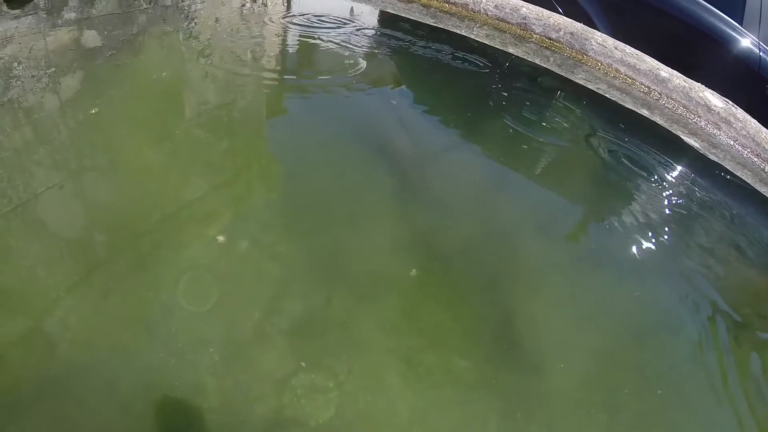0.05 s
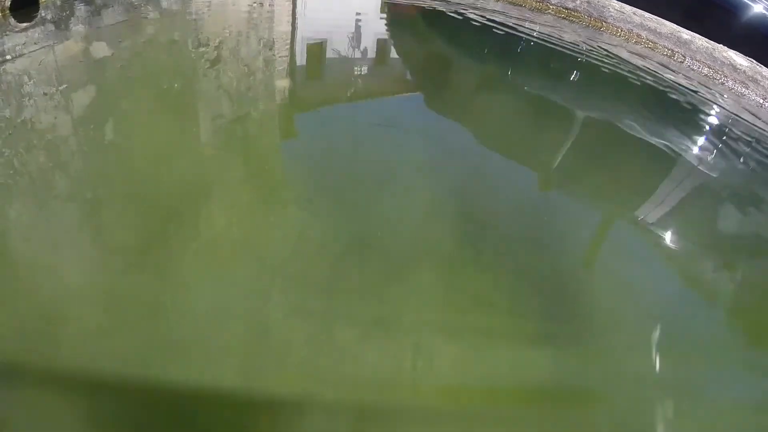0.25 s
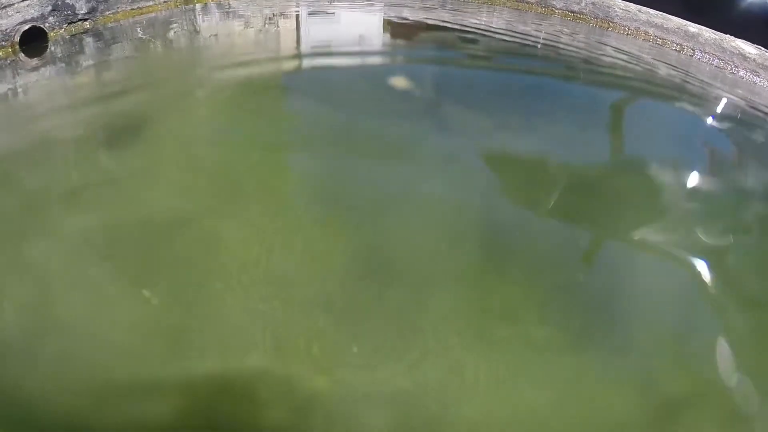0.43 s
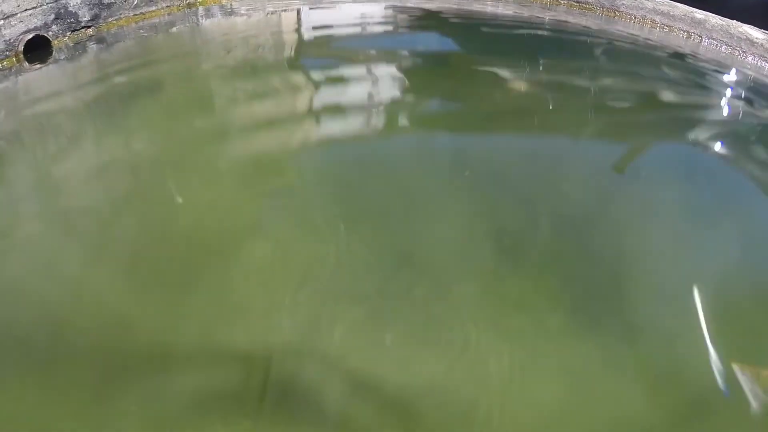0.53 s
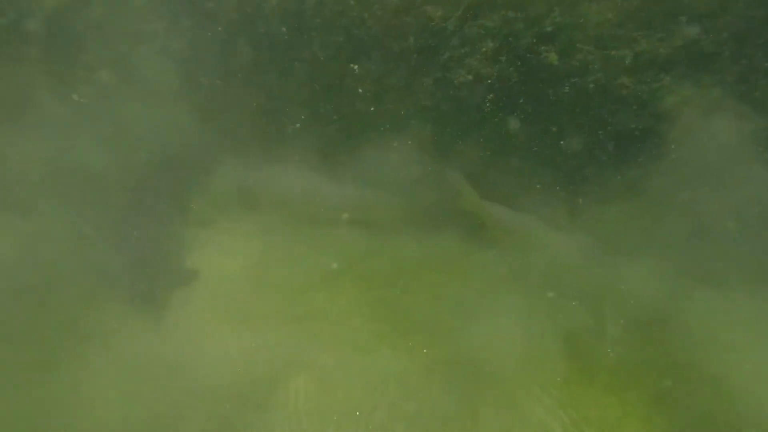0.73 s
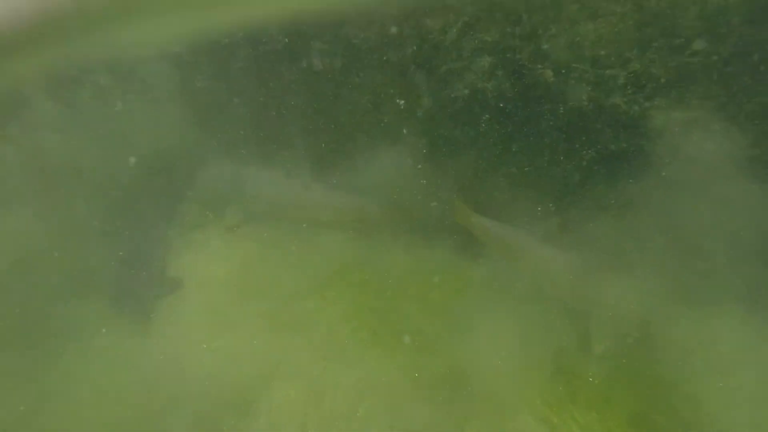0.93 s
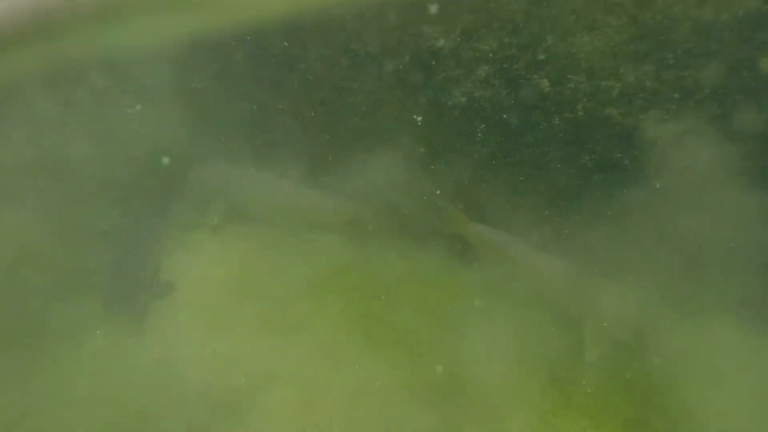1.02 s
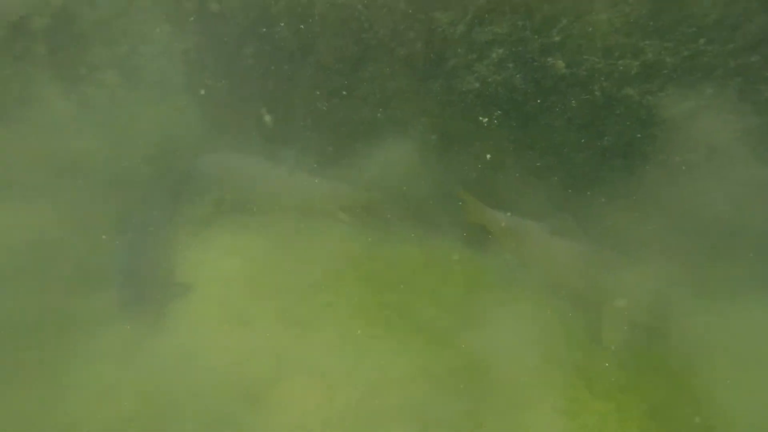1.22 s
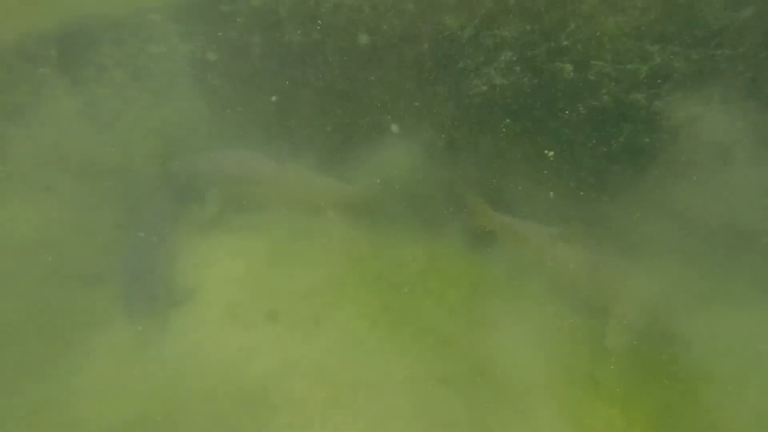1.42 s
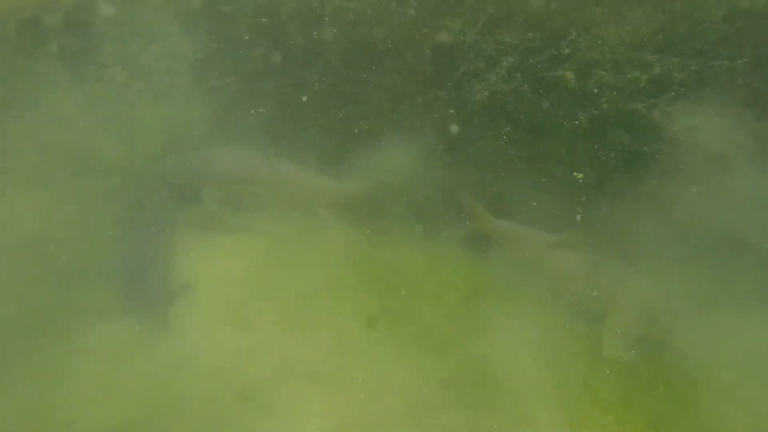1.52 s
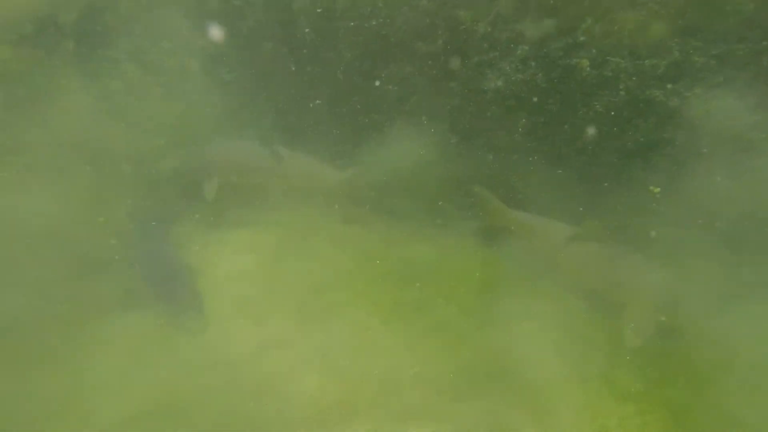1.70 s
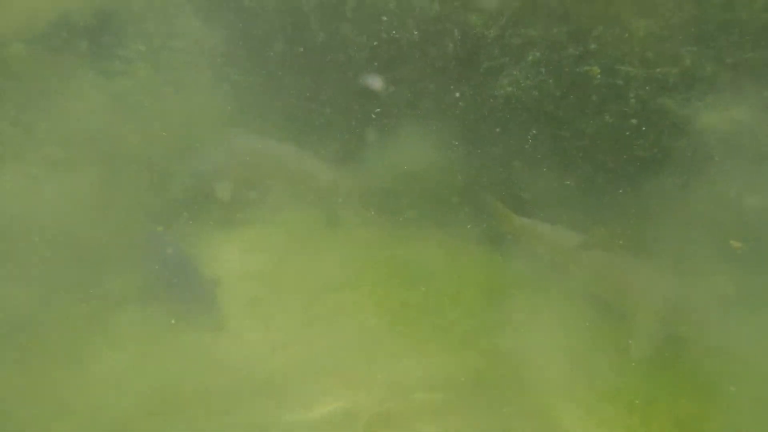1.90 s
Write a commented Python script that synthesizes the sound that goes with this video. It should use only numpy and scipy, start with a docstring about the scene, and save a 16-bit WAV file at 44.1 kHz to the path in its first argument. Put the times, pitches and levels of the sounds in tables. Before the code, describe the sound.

A camera in a plastic housing is dipped into a pond, with close, low sloshing, gurgling, knocks and scuffs. At 0.3 seconds it goes under with a crackle and the loudest, sharp click. A faint fizz and tiny bubble plip follow around 0.5, then a dull bump and clicks near 0.7. Soft swirls and a muffled underwater hush last until about 2 seconds, with one faint tick at 1.2.

```python
"""A camera in a plastic housing is dipped into a pond. Water sloshes round it and trapped air
gurgles, while the housing knocks, scuffs and clicks. At 0.3 s it goes under with a crackle and its
loudest click, which pushes the camera's gain down; the gain creeps back from there. Escaping air
fizzes, a bubble plips off, and near 0.7 s the housing bumps something. Soft eddies, one faint tick
and a muffled underwater hush remain."""
import sys
import numpy as np
from scipy import signal
from scipy.fft import rfft, irfft
from scipy.io import wavfile

SR = 44100
rng = np.random.default_rng(int(sys.argv[2]) if len(sys.argv) > 2 else 0)


def transcribe(signal):
    """Save signal, clipped to [-1, 1], as a 16-bit WAV file at the path in sys.argv[1]."""
    frames = np.atleast_2d(signal).T
    limited = np.clip(frames, -1, 1)
    pcm = np.round(limited * 32767).astype(np.int16)
    wavfile.write(sys.argv[1], SR, pcm)


N = 85995
T = np.arange(N) / SR

# Hard hits on the plastic (time [s], level [dB], pitch [Hz], t60 [s], rattle trim [dB])
CLICK_HITS = [(.0775, -32, 1200, .017, 3), (.078, -36, 1900, .014, 3), (.0785, -44, 3600, .014, 2),
              (.1495, -39, 1350, .008, 5), (.158, -42, 2300, .02, 2), (.207, -43, 2600, .015, -7),
              (.2479, -35, 8500, .011, 4), (.2527, -29, 4400, .011, 5), (.2666, -19, 2330, .011, -5),
              (.2668, -23, 3550, .007, -1), (.267, -35, 9500, .005, 5), (.2755, -28, 7000, .007, 4),
              (.2845, -25, 3700, .009, 4), (.2900, -8, 7500, .0045, -7), (.292, -20, 4000, .006, 2),
              (.2935, -2, 2000, .004, -16), (.2948, -13, 1130, .013, -14), (.2995, 3, 2650, .004, -24),
              (.3005, 3, 3480, .005, -22), (.3025, -12, 2450, .01, -8), (.431, -43, 950, .014, 3),
              (.494, -49, 6000, .008, 5), (.602, -41, 2000, .008, 6), (.6731, -16, 4300, .007, -6),
              (.6735, -16, 6950, .009, -10), (.675, -31, 2000, .01, 0), (.7842, -25.5, 2150, .012, -5),
              (.7841, -29, 3550, .012, -4), (.7843, -33, 6000, .009, -3), (.7845, -36, 7700, .008, -5),
              (1.228, -44, 1400, .016, 2), (1.229, -47, 2900, .016, 7)]
def clicks(rattle_octaves=.6, skirt_db=-31, attack_cycles=.4):
    """Each click is a fast-dying tone with a rattle of noise round its pitch."""
    out, t = np.zeros(N), T[:SR // 10]
    for start, db, hz, t60, rattle_db in CLICK_HITS:
        white = rng.standard_normal(len(t))
        edges = np.clip([hz / 2 ** rattle_octaves, hz * 2 ** rattle_octaves], 20, .45 * SR)
        band = signal.sosfilt(signal.butter(2, edges, "band", fs=SR, output="sos"), white)
        rattle = .5 * from_db(rattle_db) * (rms_one(band) + from_db(skirt_db) * white)
        tone = np.sin(2 * np.pi * hz * t)
        attack = 1 - np.exp(-(t * hz / attack_cycles) ** 2)
        decay = from_db(-60 * t / t60)
        add(out, start, from_db(db) * attack * decay * (tone + rattle))
    return lowpass(out + 1e-18, 9500)


# Body resonances of the plastic shell (pitch [Hz], gain [dB], t60 [s])
HOUSING_MODES = [(850, -2, .08), (950, -5, .07), (1160, 2, .05), (1320, -5, .08), (1470, -6, .06),
                 (1815, 6, .16), (1980, -7, .05), (2180, -5, .05), (2390, -4, .035), (2540, -6, .04),
                 (2720, -6, .04), (2830, -9, .05), (3180, -14, .04), (3480, -6, .02), (4670, -5, .02),
                 (5750, -10, .035), (7250, -7, .016)]
def housing_ring(contacts, trim_db=-1):
    """Contacts set the housing ringing, giving each a short, hollow tail."""
    return from_db(trim_db) * resonate(contacts, HOUSING_MODES)


# Dull knocks and gulps (time [s], level [dB], pitch [Hz], attack [s])
KNOCK_HITS = [(.002, -39, 140, .005), (.012, -33, 42, .012), (.0505, -19, 305, .003), (.095, -33, 55, .007),
              (.148, -30, 140, .006), (.236, -23, 150, .004), (.245, -23, 54, .012), (.268, -21, 56, .009),
              (.2922, -17, 300, .0006), (.299, -22, 140, .005), (.505, -41, 135, .007),
              (.649, -32, 260, .0015), (.6585, -23, 250, .002), (.6595, -25, 760, .001),
              (.662, -21, 48, .009), (.694, -34, 150, .005), (.742, -39, 112, .014), (.79, -42, 50, .015)]
def knocks():
    """Water-damped thumps swell and die within a few cycles."""
    out, t = np.zeros(N), T[:SR // 4]
    for start, db, hz, attack in KNOCK_HITS:
        envelope = t / attack * np.exp(1 - t / attack)
        add(out, start, from_db(db) * envelope * np.sin(2 * np.pi * hz * t))
    return out


# Fader ride of the slosh (time [s], level [dB])
SLOSH_FADER = [(0, -46.5), (.1, -38), (.22, -39), (.29, -32.5), (.35, -42), (.43, -48), (.55, -46),
               (.68, -39.5), (.85, -55), (1.1, -61), (1.95, -62)]
# Its bass-heavy EQ (frequency [Hz], gain [dB])
SLOSH_EQ = [(20, -9), (50, 0.5), (80, -9), (140, -11), (220, -24), (500, -49.5), (1500, -75)]
def slosh():
    """Water pushes on the housing in low surges."""
    return level(SLOSH_FADER) * noise(SLOSH_EQ)


# Fader ride of the gurgle, gone once the housing is under (time [s], level [dB])
GURGLE_FADER = [(0, -64), (.045, -58), (.065, -38.5), (.14, -40), (.19, -44), (.24, -40), (.28, -48),
                (.34, -60.5), (.5, -91)]
# Resonances of the air pocket (pitch [Hz], gain [dB], t60 [s])
AIR_MODES = [(338, 3, .09), (270, -8, .05), (425, -12, .05)]
def gurgle():
    """A pocket of trapped air resonates with a dark, throaty wobble."""
    pocket = rms_one(resonate(rng.standard_normal(N), AIR_MODES))
    return lowpass(level(GURGLE_FADER) * pocket, 480)


# Two quick blips (time [s], level [dB], pitch [Hz], length [s])
PLIP_NOTES = [(.5391, -23, 2850, .0018), (.5402, -28, 2130, .0042)]
def plips():
    """A small bubble breaks off the housing and sings for a few cycles."""
    out = np.zeros(N)
    for start, db, hz, length in PLIP_NOTES:
        t = T[T < length]
        envelope = np.sin(np.pi * t / length)
        add(out, start, from_db(db) * envelope * np.sin(2 * np.pi * hz * t))
    return out


# Fader ride of the crackle (time [s], level [dB])
CRACKLE_FADER = [(0, -85), (.2, -70), (.245, -57), (.255, -43), (.262, -52), (.275, -44), (.288, -40),
                 (.302, -35), (.308, -50), (.33, -85)]
# Its crisp, mid-forward EQ (frequency [Hz], gain [dB])
CRACKLE_EQ = [(500, -8), (1000, -1), (2600, 0), (4000, -5), (7000, -15), (10000, -26), (15000, -48)]
def crackle():
    """Water closes over the housing in a spray of fine ticks."""
    return level(CRACKLE_FADER) * equalise(grains(per_s=900), CRACKLE_EQ)


# Scuffs on the housing (centre time [s], level [dB], half length [s])
RUB_SWELLS = [(.11, -57, .06), (.16, -43, .007), (.19, -46, .008), (.257, -41, .016), (.434, -52, .004),
              (.505, -52, .012), (.61, -53, .015), (.651, -42, .002), (.662, -36, .004), (.695, -48, .012),
              (.78, -58, .07), (1.228, -57, .005)]
# Their dry, midrange EQ (frequency [Hz], gain [dB])
RUB_EQ = [(150, -8), (400, 2.5), (600, -2.5), (1200, 4), (2400, -8), (4000, -20.5), (8000, -39),
          (15000, -44.5)]
def rubs():
    """The housing rubs in short scuffs made of dense, tiny slips."""
    pressure = sum(swell(centre, db, half) for centre, db, half in RUB_SWELLS)
    return pressure * equalise(grains(per_s=3000), RUB_EQ)


def fizz(centre_s=.45, centre_hz=4780, fall_hz_per_s=2600, flutter_hz=220):
    """Escaping air makes a faint, thin band of hiss that sinks in pitch."""
    flutter = rms_one(lowpass(rng.standard_normal(N), flutter_hz))
    hz = centre_hz - fall_hz_per_s * (T - centre_s)
    tone = np.sin(2 * np.pi * np.cumsum(hz) / SR)
    return swell(centre_s, db=-62, half_s=.05) * flutter * tone


# Fader ride of the eddies (time [s], level [dB])
EDDY_FADER = [(0, -63), (.7, -51.5), (.9, -60.5), (1.1, -49.5), (1.27, -62), (1.5, -52.5), (1.7, -70),
              (1.95, -62)]
# Their soft, low EQ (frequency [Hz], gain [dB])
EDDY_EQ = [(40, -25), (115, 1), (170, -8.5), (310, -5.5), (550, -26.5), (2000, -51)]
def eddies():
    """Water swirls past in three gentle swells."""
    return level(EDDY_FADER) * noise(EDDY_EQ)


# Fader ride of the underwater bed (time [s], level [dB])
HUSH_FADER = [(0, -54), (.25, -52), (.55, -50), (1.1, -50.5), (1.95, -52)]
# Its muffled EQ (frequency [Hz], gain [dB])
HUSH_EQ = [(25, -12), (55, 0), (90, -4), (210, -2.5), (280, -7.5), (350, -7.5), (550, -15), (950, -15.5),
           (1350, -17), (1900, -17.5), (2550, -21), (4000, -26.5), (7000, -34), (9200, -39.5), (10200, -39),
           (11500, -43.5), (14800, -47), (16000, -62)]
def hush():
    """The pond lays a near-steady hush under everything."""
    return level(HUSH_FADER) * noise(HUSH_EQ)


def from_db(db):
    """Decibels to gain."""
    return 10 ** (np.asarray(db) / 20)


def rms_one(x):
    """Scale to unit power."""
    return x / np.sqrt(np.mean(x ** 2) + 1e-20)


def level(fader):
    """Gain over time from (time [s], level [dB]) points."""
    return from_db(np.interp(T, *np.transpose(fader)))


def swell(centre_s, db, half_s):
    """A bell-shaped fade in and out."""
    return from_db(db) * np.exp(-.5 * ((T - centre_s) / half_s) ** 2)


def lowpass(x, hz):
    """Roll off the top at 12 dB an octave."""
    return signal.sosfilt(signal.butter(2, hz, fs=SR, output="sos"), x)


def equalise(x, eq):
    """Shape a steady signal with an EQ curve; rms 1."""
    hz, db = np.transpose(eq)
    f = np.maximum(np.arange(N // 2 + 1) * SR / N, 1)
    low_cut = np.minimum(f / hz[0], 1) ** 2
    curve = from_db(np.interp(np.log(f), np.log(hz), db))
    return rms_one(irfft(rfft(x) * low_cut * curve, N))


def noise(eq):
    """Coloured noise, rms 1."""
    return equalise(rng.standard_normal(N), eq)


def grains(per_s, spread_db=2.5):
    """Random tiny impulses of uneven size."""
    impulses = (rng.random(N) < per_s / SR) * rng.choice([-1, 1], N)
    return impulses * from_db(spread_db * rng.standard_normal(N))


def resonate(x, modes):
    """Parallel resonators, each peaking at its own gain."""
    out = 0
    for hz, db, t60 in modes:
        r = from_db(-60 / (t60 * SR))
        feedforward = np.array([1, 0, -1]) * (1 - r * r) / 2
        feedback = [1, -2 * r * np.cos(2 * np.pi * hz / SR), r * r]
        out = out + from_db(db) * signal.lfilter(feedforward, feedback, x + 1e-18)
    return out


def add(out, start_s, sound):
    """Mix a sound in at a time."""
    i = int(start_s * SR)
    out[i:i + len(sound)] += sound[:N - i]


def scene():
    """Mono mix: the housing up front, air and water round it."""
    contacts = clicks() + rubs() + crackle()
    housing = contacts + housing_ring(contacts) + knocks()
    air = plips() + fizz() + gurgle()
    water = slosh() + eddies() + hush()
    return (housing + air + water)[None]


def record(dry, threshold_db=-8, attack_s=.005, release_db_per_s=10, stop_hz=16700):
    """The camera's gain ducks on a peak and creeps back; overshoots clip and the top is cut."""
    over_db = np.maximum(20 * np.log10(np.abs(dry[0]) + 1e-9) - threshold_db, 0)
    release_db = release_db_per_s * T
    held_db = np.maximum.accumulate(over_db + release_db) - release_db
    r = np.exp(-1 / (attack_s * SR))
    duck_db = signal.lfilter([1 - r], [1, -r], held_db)
    clipped = np.clip(dry * from_db(-duck_db), -1, 1)
    return signal.sosfilt(signal.cheby2(12, 70, stop_hz, fs=SR, output="sos"), clipped)


dry = scene()
out = record(dry)
transcribe(out)
```